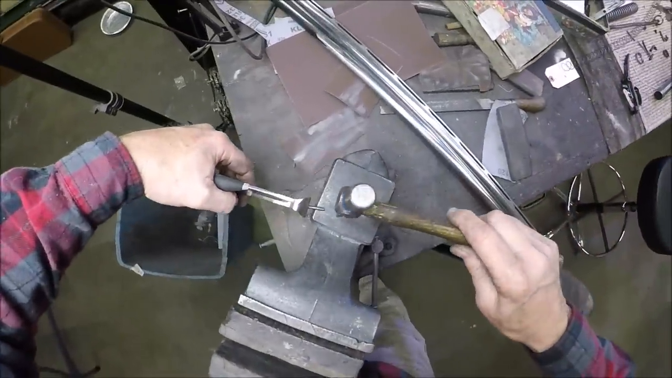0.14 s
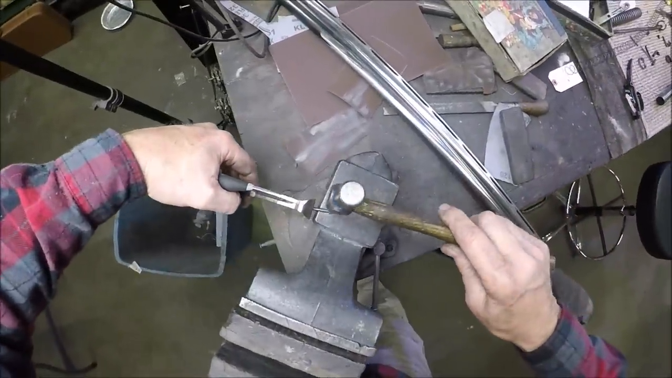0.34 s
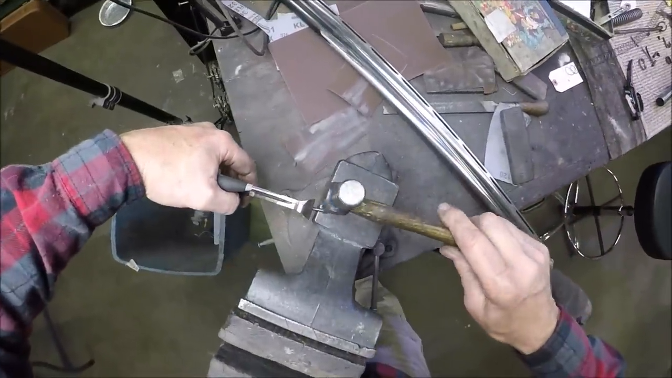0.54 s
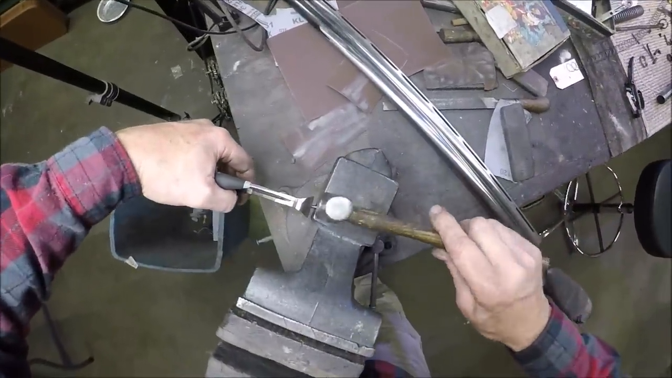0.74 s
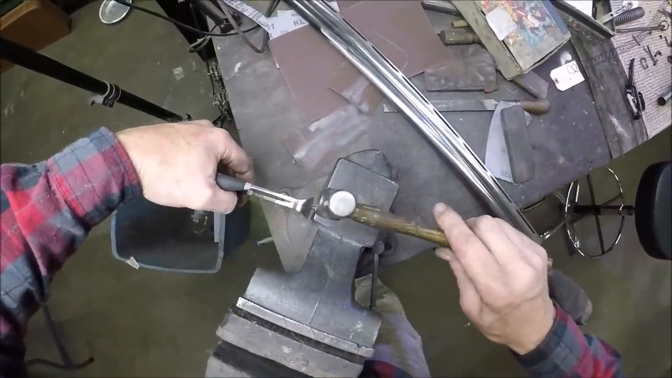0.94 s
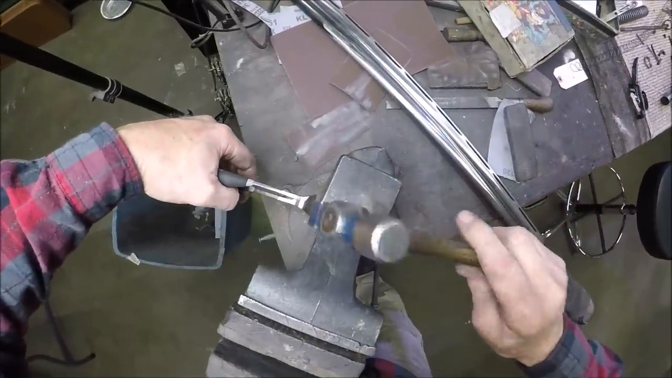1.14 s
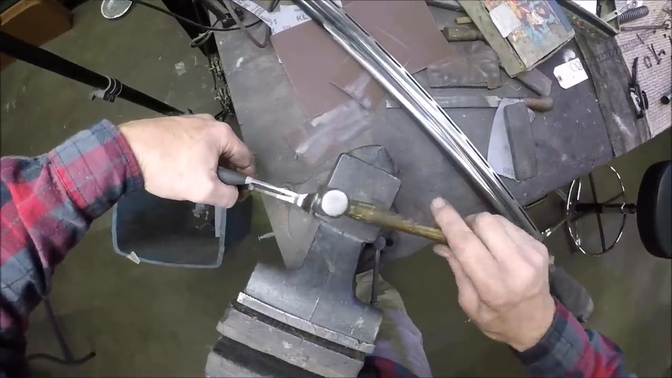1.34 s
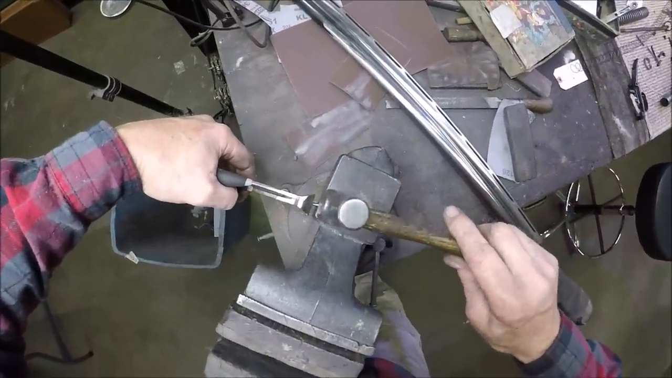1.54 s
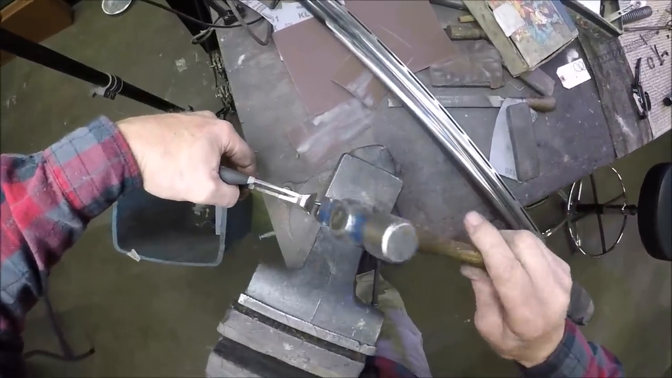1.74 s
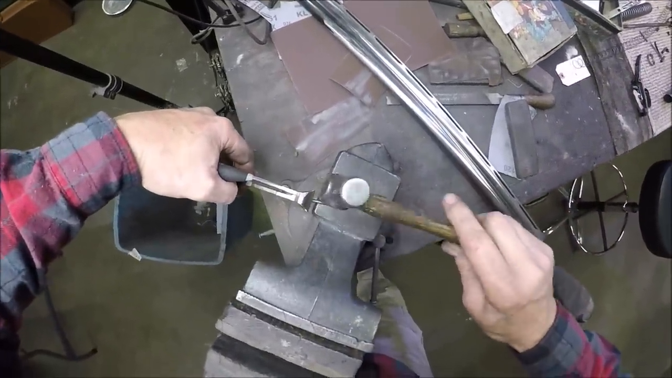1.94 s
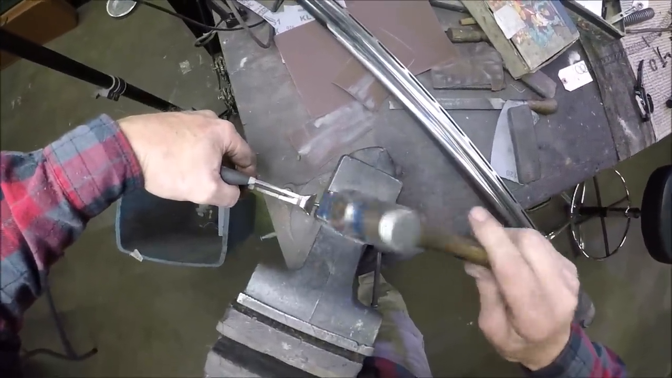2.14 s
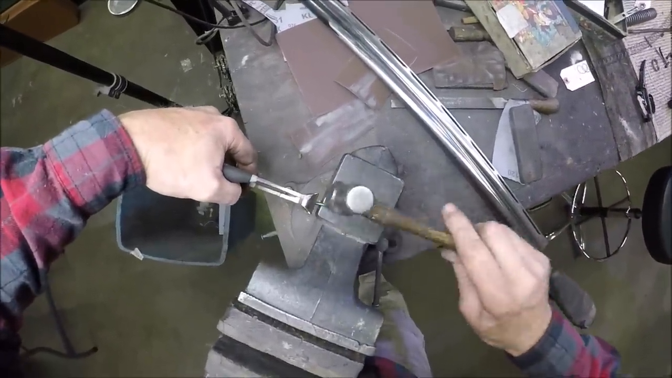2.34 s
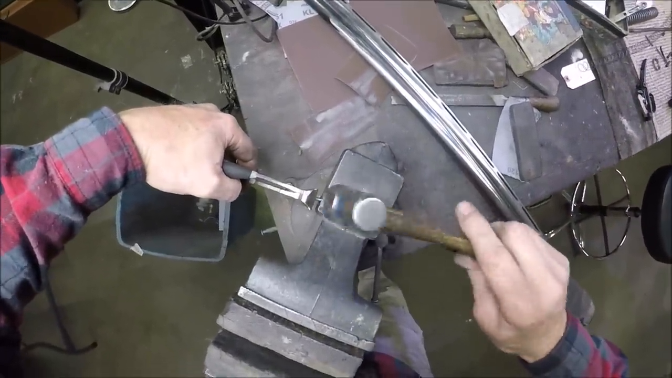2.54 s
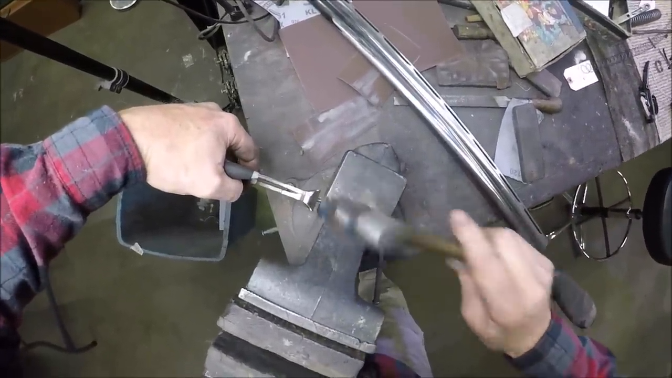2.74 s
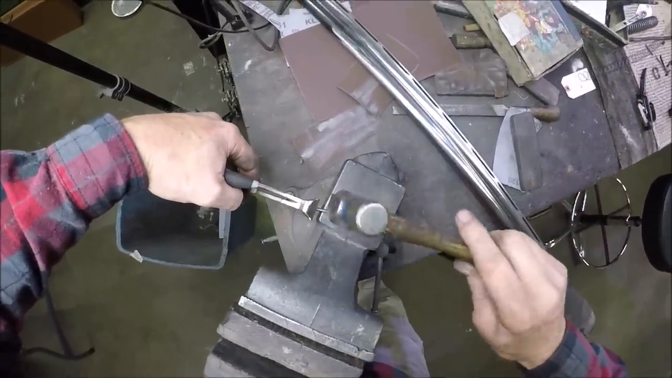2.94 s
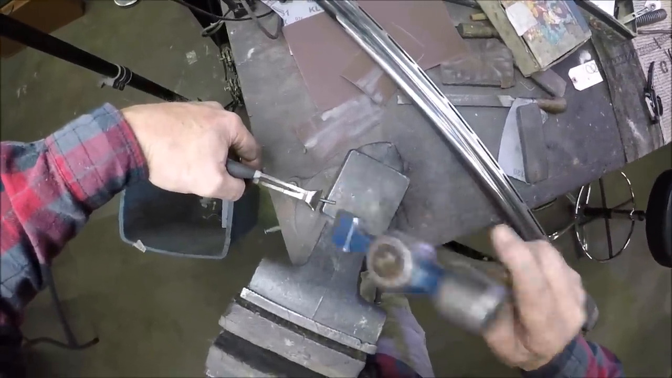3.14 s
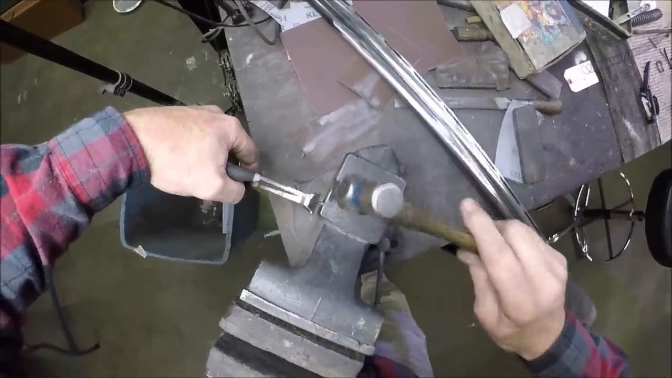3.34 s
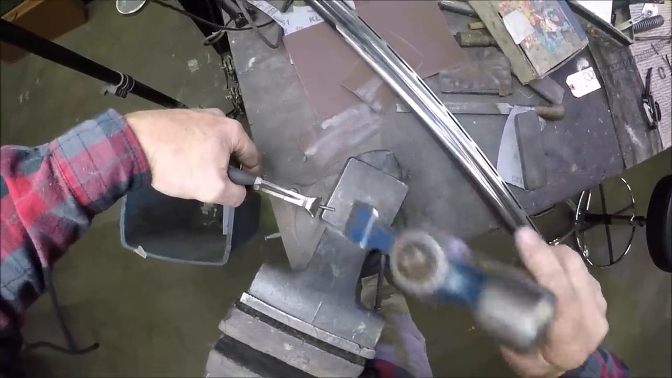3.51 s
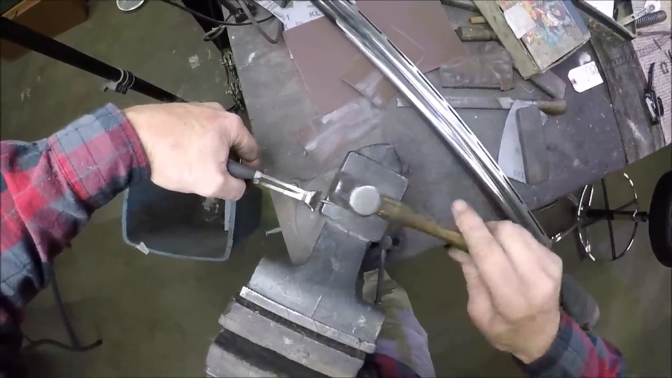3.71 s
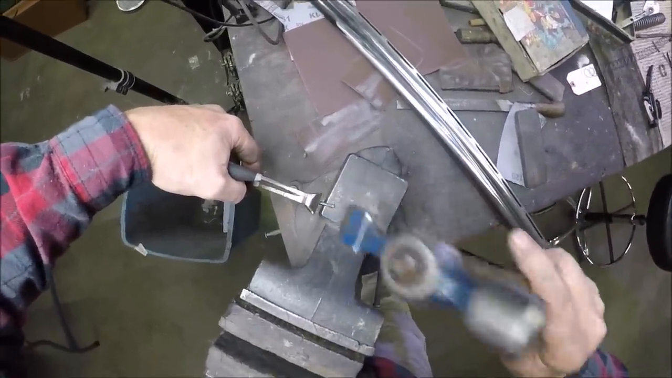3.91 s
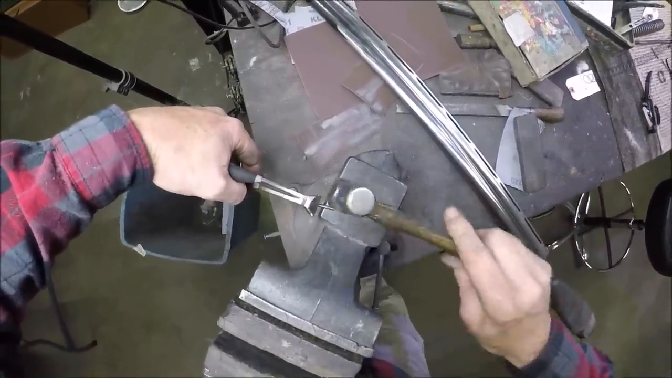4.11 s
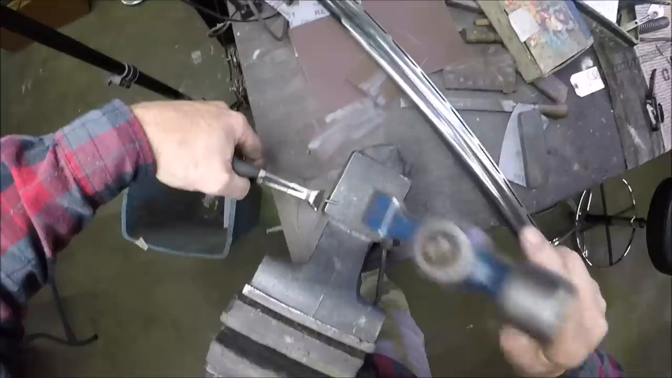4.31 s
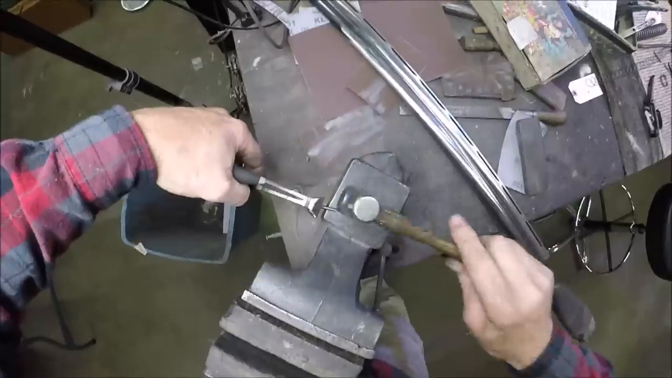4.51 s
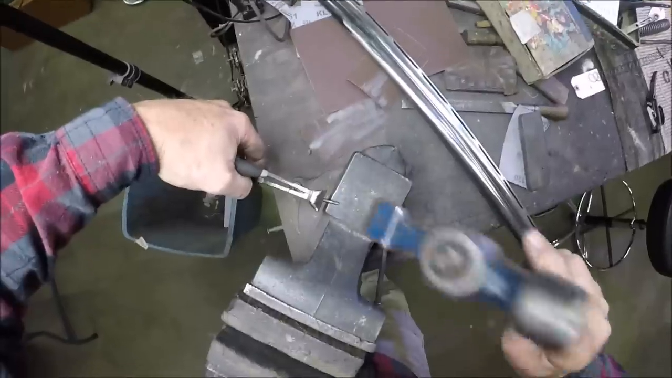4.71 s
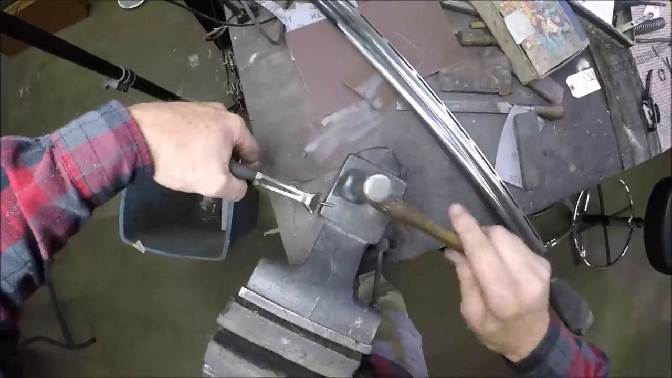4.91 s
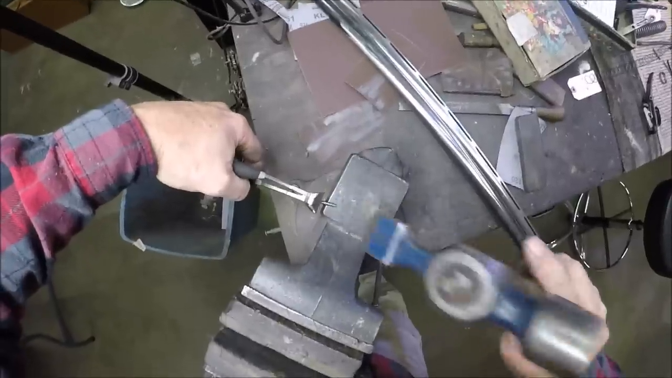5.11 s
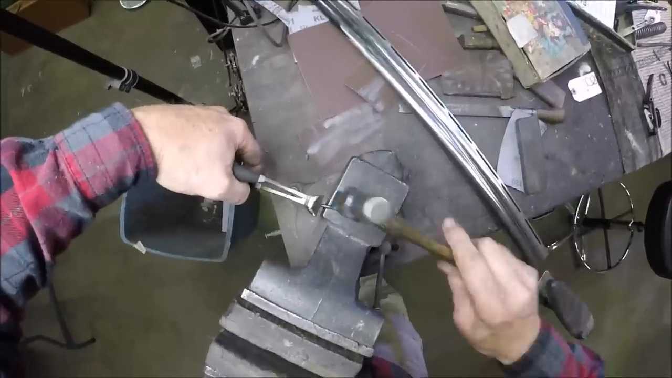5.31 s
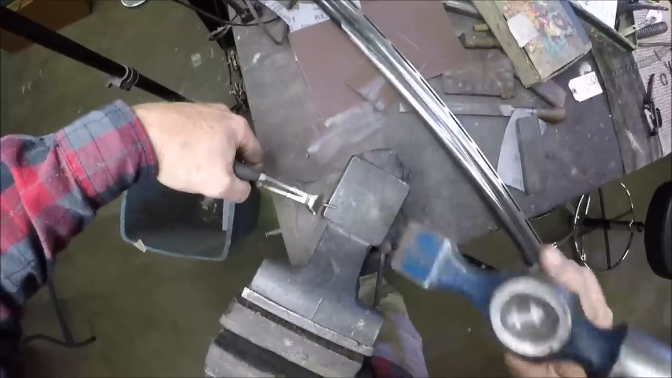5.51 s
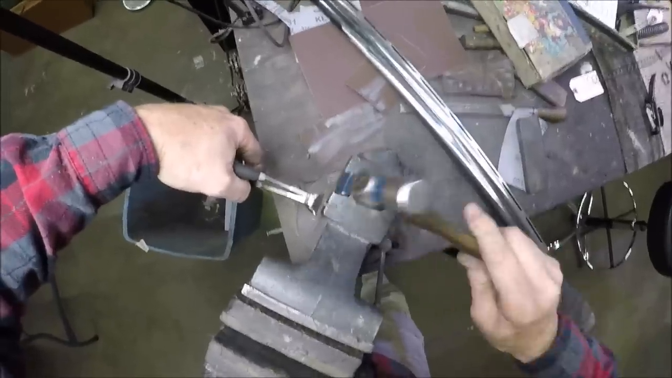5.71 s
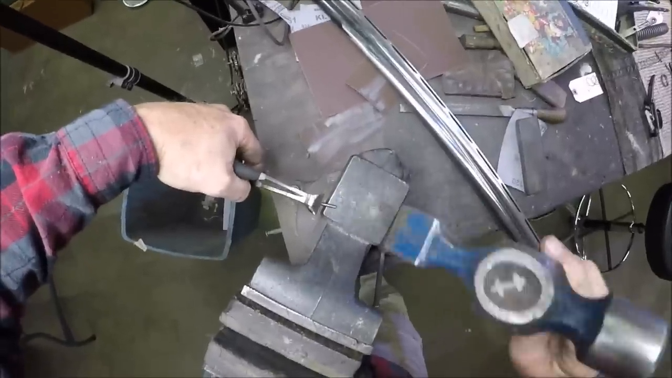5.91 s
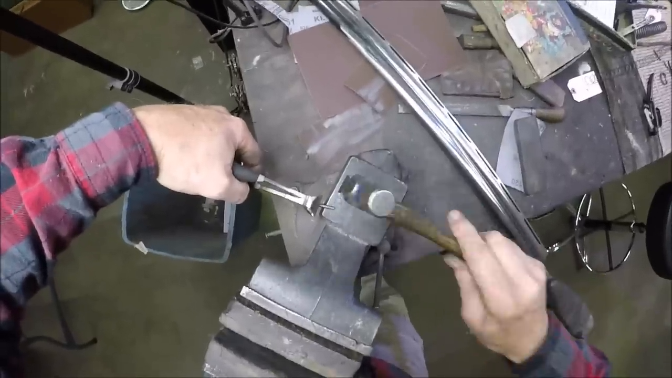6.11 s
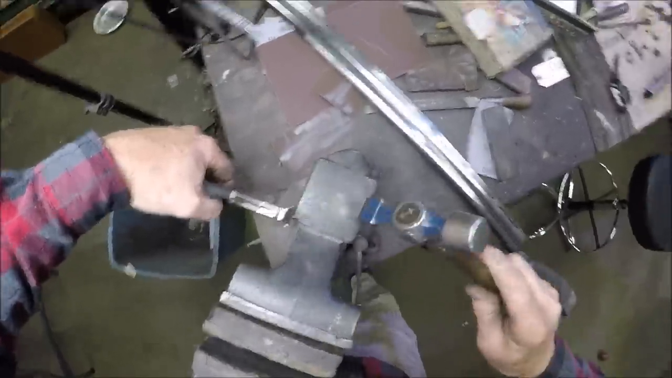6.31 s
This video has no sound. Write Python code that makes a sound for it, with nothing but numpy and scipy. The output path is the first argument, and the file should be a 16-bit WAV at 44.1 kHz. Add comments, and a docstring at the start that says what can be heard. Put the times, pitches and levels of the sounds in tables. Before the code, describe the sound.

After a quiet workshop lead-in, a hammer cracks against steel about every half second, each hit pinging, thumping the bench and echoing briefly.

```python
"""Workshop: a hammer drives a small steel pin on the anvil of a bench vise, under a head-worn camera.
Each blow is a crack of dying sines plus grit, wavering steel rings, a bench thump, a noise echo and a camera
jolt; loose tools hop afterwards with tick and thud, over coloured room noise and low rumble.
The recorder ducks after the blows, turns down slowly, clips the cracks softly and opens its bass cut."""
import sys
import numpy as np
from scipy import signal
from scipy.fft import rfft, irfft
from scipy.io import wavfile
from scipy.ndimage import uniform_filter1d

SR = 44100
rng = np.random.default_rng(int(sys.argv[2]) if len(sys.argv) > 2 else 0)


def generate_wav(sig):
    """Save sig (samples, or channels by samples) to the path in sys.argv[1] as 16-bit PCM at SR."""
    pcm = np.round(np.clip(np.atleast_2d(sig).T, -1, 1) * 32767).astype(np.int16)
    wavfile.write(sys.argv[1], SR, pcm)


N = 284621

# hammer blows; where the face lands sets how steel rings: (time [s], strength [dB],
# direct vise ping [dB re blow], later vise ring [dB re table], hammer ring [dB re table])
BLOWS = [(0.8151, -6.5, -12, -6, -17), (1.3072, -5.5, -21, -8.5, 0.5), (1.8908, -4.5, -11.5, 0, 0.5),
         (2.374, -3.5, -12, 0, -0.9), (2.8311, -2.1, -20.5, -12, 4.7), (3.271, -2, -10.5, 3, 11),
         (3.6937, -1.5, -10, 2, -2.5), (4.1072, -1.5, -12.5, -9.5, -10), (4.5164, 0.3, -18, -12, -1.5),
         (4.9359, -1, -10, 2.5, 8.5), (5.3133, -1, -9.5, 1, 9), (5.6965, 0.6, -17, -9, 13),
         (6.0947, 1.6, -5.5, 4, 14)]
HOLD_S, HOLD_SHARE = 0.18, 0.42  # fading runs at this share of clock speed until the hold ends


def gain_of(db):
    """dB to gain."""
    return 10 ** (np.asarray(db) / 20)


def evened(x):
    """Scales to rms 1."""
    return x / np.sqrt(np.mean(x ** 2) + 1e-20)


def read(points, hz):
    """Value of a spectrum table at hz, interpolated over log frequency."""
    f, value = np.transpose(points)
    return np.interp(np.log(hz + 1), np.log(f + 1), value)


def add(mix, start_s, sound):
    """Mixes a stereo sound in at start_s."""
    part = mix[:, round(start_s * SR):][:, :sound.shape[1]]
    part += sound[:, :part.shape[1]]


def lag(x, tau_s):
    """One-pole lowpass with time constant tau_s."""
    r = np.exp(-1 / (tau_s * SR))
    return signal.lfilter([1 - r], [1, -r], x)


def ring(modes, detune=1, delay_s=0):
    """Damped modes struck together: exponentially dying sines, each with its own balance."""
    t = np.maximum(np.arange(SR)[None] / SR - delay_s, 0)
    sides = np.array([[.5], [-.5]])
    total = 0
    for hz, db, t60_s, pan_db in modes:
        level_db = db + pan_db * sides - 60 * t / t60_s
        total = total + gain_of(level_db) * np.sin(2 * np.pi * hz * detune * t)
    return total


def held(t):
    """Fading time: slow until the hold is over, then about a fifth faster than the clock."""
    return HOLD_SHARE * t + (1 - HOLD_SHARE) * 0.022 * np.logaddexp(0, (t - HOLD_S) / 0.016)


def hiss(spectrum, likeness, size, shape_db, count):
    """Stereo noise built in the STFT, with given colour, left-right likeness and level over Hz and time."""
    hop = size // 4
    frames, hz = count // hop + 5, np.fft.rfftfreq(size, 1 / SR)
    a, b, c, d = rng.standard_normal((frames, len(hz), 4)).T
    same = np.clip(read(likeness, hz), -1, 1)[:, None]
    left, other = a + 1j * b, c + 1j * d
    z = np.array([left, same * left + np.sqrt(1 - same ** 2) * other])
    z *= gain_of(read(spectrum, hz)[:, None] + shape_db(hz[:, None], np.arange(frames) * hop / SR))
    return signal.istft(z, nperseg=size, noverlap=size - hop)[1][:, :count]


def room_tone():
    """Two steady coloured noises: broadband hiss and low room tone."""
    # hiss colour: (frequency [Hz], density [dB per Hz])
    air_colour = [(350, -29), (600, -1), (902, 3), (1300, -5.5), (2340, -12.5), (3980, -16.5), (5590, -15),
                  (7540, -11), (14100, -20), (15500, -35)]
    # low room tone colour: (frequency [Hz], density [dB per Hz])
    low_colour = [(59, -62.5), (100, -27.5), (141, -9.5), (161, -14), (264, 1.5), (314, -5.5), (356, 0.5),
                  (416, -6), (650, -10), (840, -48.5), (1430, -120)]
    # ports alike: (frequency [Hz], left-right likeness [-1..1])
    port_likeness = [(60, 0.0069), (240, -0.24), (950, -0.95), (3770, 0.82), (15000, -1.3)]
    air_db, low_db = -57.5, -57.5  # rms
    flat = lambda hz, t: 0 * t
    air = gain_of(air_db) * evened(hiss(air_colour, port_likeness, 1024, flat, N))
    return air + gain_of(low_db) * evened(hiss(low_colour, port_likeness, 2048, flat, N))


def rumble():
    """Air and head movement at the ports: lowpassed noise whose level wanders in lumps."""
    base_db, corner_hz, lump_db = np.array([[-38], [-38]]), 31, 5.5  # base (left, right); lumps rms
    low, lumps = rng.standard_normal((2, 2, N))
    low = evened(signal.sosfilt(signal.butter(2, corner_hz, fs=SR, output="sos"), low))
    lumps = evened(uniform_filter1d(uniform_filter1d(lumps, 4000), 4000))
    return gain_of(base_db + lump_db * lumps) * low


def room():
    """Room tone and rumble, with an earlier ring decaying from the start."""
    # ring still dying: (frequency [Hz], level [dB], t60 [s], left-right [dB])
    earlier_ring = [(6183, -49.5, 0.4, 8)]
    out = room_tone() + rumble()
    add(out, 0, ring(earlier_ring))
    return out


def hops():
    """Loose tools land again: roughened tick modes plus a thud mode."""
    # clearest hops: (time [s], tick [dB], thud [dB])
    clear_hops = [(1.941, -44, -30), (3.006, -50, -34.5), (3.042, -51.5, -38.5), (3.346, -39, -32),
                  (3.775, -33.5, -40), (3.897, -54, -35.5), (4.191, -40.5, -32), (4.258, -49, -34),
                  (4.305, -56, -27.5), (4.593, -32, -27), (4.658, -37.5, -28.5), (4.71, -47.5, -34),
                  (5.02, -39.5, -37), (5.404, -32, -44), (5.461, -38.5, -32.5), (5.771, -40.5, -25.5),
                  (5.832, -49, -35)]
    # tool modes before detuning: (frequency [Hz], level [dB re tick], t60 [s], left-right [dB])
    tool_modes = [(990, 3, 0.046, -9), (1288, 0.5, 0.052, 3), (1640, -16, 0.016, -13),
                  (510, -2, 0.025, -18)]
    # thud mode: (frequency [Hz], level [dB re thud], t60 [s], left-right [dB])
    thud_modes = [(261.3, -11.5, 0.14, -30.5)]
    faint_tick_db, faint_thud_db = -60, -38.5  # re blow
    out, t = np.zeros((2, N)), np.arange(SR) / SR
    # one faint hop at a random moment soon after each blow
    waits_s = rng.uniform(0.11, 0.34, len(BLOWS))
    faint = [(s + wait_s, db + faint_tick_db, db + faint_thud_db)
             for (s, db, *_), wait_s in zip(BLOWS, waits_s)]
    landings = faint + clear_hops
    for (s, tick_db, thud_db), shift in zip(landings, rng.standard_normal(len(landings))):
        contact = rng.standard_normal((2, SR))  # several points touch down
        for _ in range(3):
            contact = lag(contact, 0.00017)
        rough = 1 + .5 * evened(contact)
        tick = ring(tool_modes, 1 + 0.04 * shift) * rough * (1 - np.exp(-t / 0.00033))
        add(out, s, gain_of(tick_db) * tick + gain_of(thud_db) * ring(thud_modes))
    return out


def echo():
    """The workshop's answer to one blow: strong near walls, then each band dying at its own speed."""
    # echo colour: (frequency [Hz], density [dB per Hz])
    colour = [(59, -45), (100, -5), (129, 2.5), (250, -5.5), (303, -20), (334, -24.5), (588, -21.5),
              (835, -24.5), (1750, -20), (2090, -28), (3390, -20.5), (3890, -34), (5740, -23),
              (9900, -43.5), (10500, -69.5), (13600, -73.5), (22000, -120)]
    # decay, on held time above 1200 Hz: (frequency [Hz], t60 [s])
    band_t60 = [(150, 0.52), (500, 0.59), (1500, 0.2), (3500, 0.38), (7000, 0.39), (11000, .35)]
    # ports alike: (frequency [Hz], left-right likeness [-1..1])
    likeness = [(130, 1), (290, 0.85), (640, 0.74), (1400, 0), (3100, 0.86), (6800, 0.13)]
    tail_db, early_db, early_tau_s, rise_tau_s = -25, 16, 0.015, 0.0052

    def decay_db(hz, t):
        fading_s = np.where(hz > 1200, held(t), t)
        return np.maximum(-60 * fading_s / read(band_t60, hz), -200)

    tail = hiss(colour, likeness, 256, decay_db, SR)
    tail = tail / np.std(tail[:, :2000])
    t = np.arange(SR) / SR
    early = 1 + gain_of(early_db) * np.exp(-t / early_tau_s)
    return gain_of(tail_db) * tail * (1 - np.exp(-t / rise_tau_s)) * early


def camera_jolt():
    """Damped camera wobble, swelling in after each port's delay."""
    wobble_hz, t60_s, rise_s = 14, 0.59, .04
    delay_s, level_db = np.array([[.024], [.012]]), np.array([[-15.5], [-3]])  # (left, right)
    t = np.arange(SR) / SR
    wobble = -gain_of(level_db) * ring([(wobble_hz, 0, t60_s, 0)], delay_s=delay_s)
    return wobble * (1 - np.exp(-(np.maximum(t - delay_s, 0) / rise_s) ** 2))


def bench_thump():
    """Bench modes answer a little late, then lose level as the bench drops back on its feet."""
    # bench modes: (frequency [Hz], level [dB re blow], t60 [s], left-right [dB], delay [s])
    bench_modes = [(297.2, -10, 0.07, -3, 0.0054), (251.7, -11, .15, -5, 0.0021),
                   (154.9, -15.5, 0.4, -2, 0.0028), (120.95, -12, 0.4, -4, 0.0035),
                   (103.8, -16, 0.27, -8.5, 0.0053), (78.5, -26, 0.82, -9, 0.0017),
                   (37.5, -17.5, 0.22, -16.5, .008), (420, -35.5, .15, -3.5, 0.009),
                   (25.5, -8.5, 0.2, -11.5, 0.023)]
    settle_s, settle_db = 0.057, -12
    t = np.arange(SR) / SR
    thump = sum(ring([mode[:4]], delay_s=mode[4]) for mode in bench_modes)
    settled = 1 / (1 + np.exp(np.clip((settle_s - t) / 0.0013, -50, 50)))
    return thump * gain_of(settle_db * settled)


def wavering(hz, width_hz, db, t60_s):
    """A ring whose height and phase wander as narrow-band noise, partly shared between the ports."""
    steady, steady_width_hz = 1, 38  # unwavering core; rings wider than this lose it
    t, r = np.arange(SR // 2) / SR, np.exp(-np.pi * width_hz / SR)
    a, b = rng.standard_normal((2, 2, SR // 2 + 4000))
    drift = signal.lfilter([1], np.convolve([1, -r], [1, -r]), a + 1j * b)[:, 4000:]
    drift = drift + 0.2 * drift[::-1]
    core = steady / (1 + (width_hz / steady_width_hz) ** 4) * np.exp(2j * np.pi * rng.random((2, 1)))
    drift = drift / np.std(drift) + core
    tone = evened((drift * np.exp(2j * np.pi * hz * t)).real)
    return gain_of(db - 60 * held(t) / t60_s) * tone * (1 - np.exp(-t / 0.0033))


def add_steel_rings(out, s, db, vise_db, hammer_db):
    """Steel rings as the room returns them, raised or lowered by the part that rings."""
    # rings: (frequency [Hz], width of each of two poles [Hz], level [dB re blow], t60 on held time [s],
    # part [0 = any blow, 1 = vise, 2 = hammer])
    steel_rings = [(5620, 44, -36.5, 0.44, 1), (10835, 11, -54, 0.48, 2), (13170, 18, -66, .5, 2),
                   (1740, 150, -45, 0.33, 0), (2510, 37, -41.5, 0.3, 0), (2770, 65, -47.5, 0.46, 0),
                   (3280, 36, -49, 0.58, 0), (3420, 60, -43, .4, 0), (4300, 180, -50, 0.38, 0),
                   (7010, 63, -43, 0.23, 0)]
    part_db = (0, vise_db, hammer_db)
    for hz, width_hz, ring_db, t60_s, part in steel_rings:
        add(out, s, wavering(hz, width_hz, db + ring_db + part_db[round(part)], t60_s))


def crack(db, ping_db, shift):
    """Steel on steel: short modes, brighter for firm blows, with grit and a direct vise ping."""
    # modes damped by hand and bench, before tilt and detuning:
    # (frequency [Hz], level [dB re blow], t60 [s], left-right [dB], right port later by [ms])
    crack_modes = [(616, -20.5, 0.09, -9, 0.61), (996, -8.5, .03, -0.5, 0.13),
                   (1617, -16, 0.046, 11, 0.075), (1928, -3, 0.0078, 16, 0.067), (2237, -2, 0.0053, -4, 0),
                   (2578, 8.5, 0.0063, -2.5, 0.055), (3300, -4.5, 0.012, -3, 0.003),
                   (4678, 0.5, 0.0047, 2, 0), (5960, -15.5, 0.044, -0.5, 0.035),
                   (7040, -18.5, 0.031, 1.5, 0.054), (9710, -16, 0.0068, -17, .06),
                   (13300, -33, .006, 14.5, 0.16), (15130, -40, .008, 6, 0.21)]
    firm_db, bright_db_per_octave, dulling = -4, 1.5, 2.1  # each dB below firm takes dulling off the tilt
    high_delay_s, grit_db = 0.00036, -13  # modes above 4 kHz speak later; grit before filtering
    vise_hz, ping_t60_s, ping_pan_db = 5630, 0.059, -1.5
    t = np.arange(SR) / SR
    tilt_db = bright_db_per_octave - dulling * max(firm_db - db, 0)
    sound = np.zeros((2, SR))
    for hz, level_db, t60_s, pan_db, ms in crack_modes:
        delay_s = np.array([[max(-ms, 0)], [max(ms, 0)]]) / 1000 + high_delay_s * (hz > 4000)
        mode = (hz, level_db + tilt_db * np.log2(hz / 2600), t60_s, pan_db)
        sound -= ring([mode], 1 + 0.011 * shift, delay_s)
    band = signal.butter(2, (1200, 6000), "band", fs=SR, output="sos")
    grit = signal.sosfilt(band, rng.standard_normal(SR))
    sound += gain_of(grit_db) * grit * np.exp(-t / 0.0078)  # the pin skids as it is hit
    ping = ring([(vise_hz, ping_db, ping_t60_s, ping_pan_db)])
    return (sound + ping) * (1 - np.exp(-t / 0.00055))


def blows():
    """Crack, bench thump, echo, camera jolt and steel rings of every blow, scaled by its strength."""
    out = np.zeros((2, N))
    thump, jolt = bench_thump(), camera_jolt()
    for (s, db, ping_db, vise_db, hammer_db), shift in zip(BLOWS, rng.standard_normal(len(BLOWS))):
        add(out, s, gain_of(db) * (crack(db, ping_db, shift) + thump + echo() + jolt))
        add_steel_rings(out, s, db, vise_db, hammer_db)
    return out


def scene():
    """All sources at the two ports."""
    return room() + hops() + blows()


def bass_cut(dry):
    """Zero-phase bass cut with a peak at its edge, opening over time; rings a little before each blow too."""
    cut_hz, peak_db = 140, 10.5
    open_s, spread_s, shut_share, open_share = 1.78, 0.22, 0.069, 0.91  # shares of the removed part let back in
    t, hz = np.arange(N) / SR, np.fft.rfftfreq(N, 1 / SR)
    peak = gain_of(peak_db * np.exp(-((hz - 1.15 * cut_hz) / 30) ** 2))
    cut = irfft(rfft(dry) * peak / (1 + (cut_hz / (hz + 1)) ** 12), N)
    share = shut_share + (open_share - shut_share) / (1 + np.exp((open_s - t) / spread_s))
    return cut + np.clip(share, 0, 1) * (dry - cut)


def ducked(x):
    """Gain reduction at three speeds, driven by the level above a threshold."""
    threshold_db, release_db_per_s = -21.5, 110
    power = signal.lfilter([.01], [1, -.99], (x ** 2).mean(0))
    quick_db = 10 * np.log10(power + 1e-12)
    fall_db = release_db_per_s * np.arange(N) / SR
    peak_db = np.maximum.accumulate(quick_db + fall_db) - fall_db
    over_db = np.maximum(peak_db - threshold_db, 0)
    duck_db = 0.54 * lag(over_db, 0.0015)
    late_db = 2.71 * lag(lag(lag(duck_db, .1), .1), .1)  # belated, deepest about a quarter second after a blow
    slow_db = 0.41 * lag(duck_db, 2.2)  # remembers for seconds
    return x / gain_of(duck_db + late_db + slow_db)


def record(dry):
    """Opening bass cut, ducking, soft clipping and band limit."""
    ceiling, edge_hz = .58, 16500
    x = ducked(bass_cut(dry))
    x = ceiling * np.tanh(x / ceiling)
    lowpass = signal.firwin(511, edge_hz, window=("kaiser", 9), fs=SR)
    return signal.oaconvolve(x, lowpass[None], "same")


dry = scene()
out = record(dry)
generate_wav(out)
```